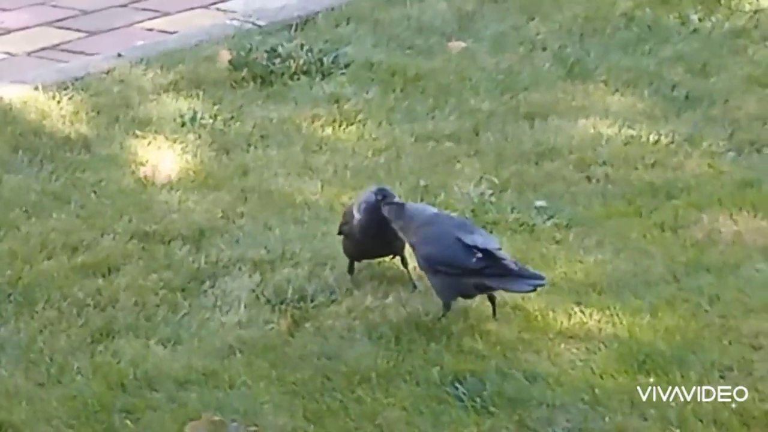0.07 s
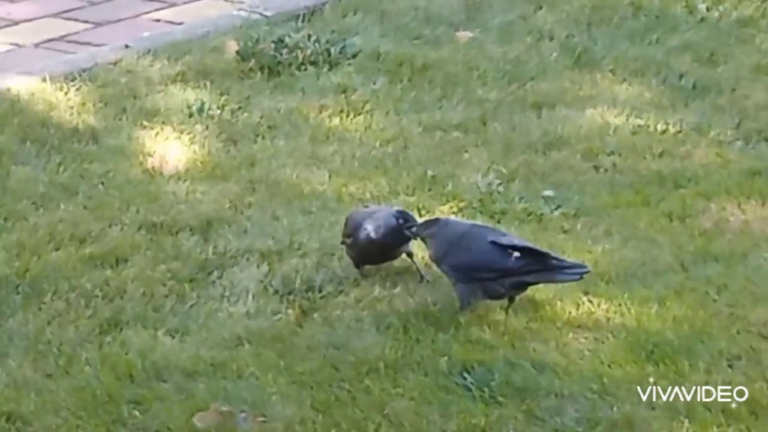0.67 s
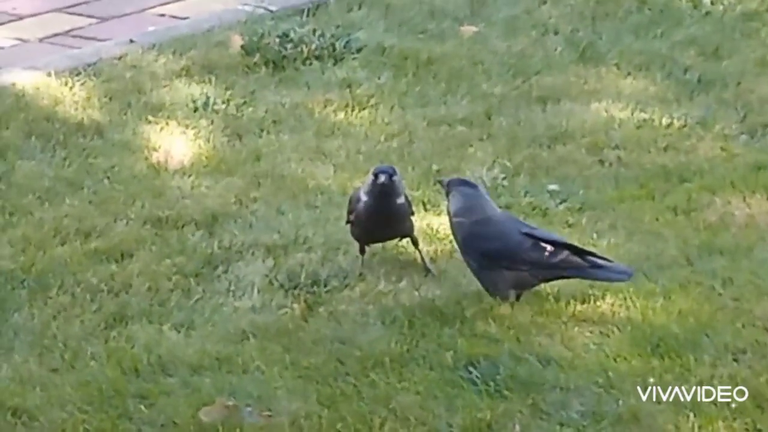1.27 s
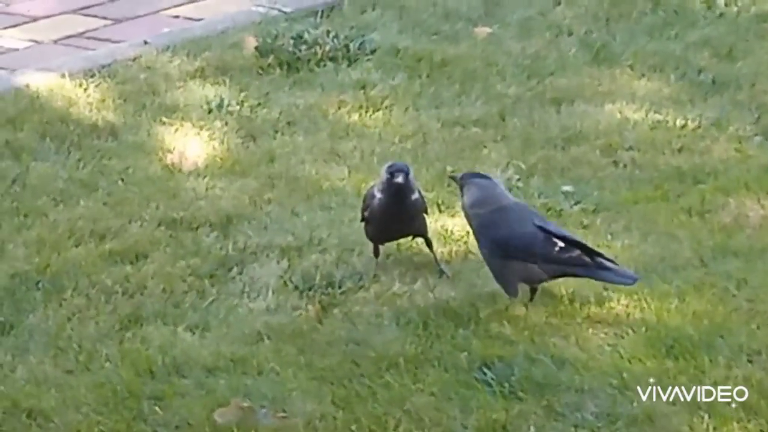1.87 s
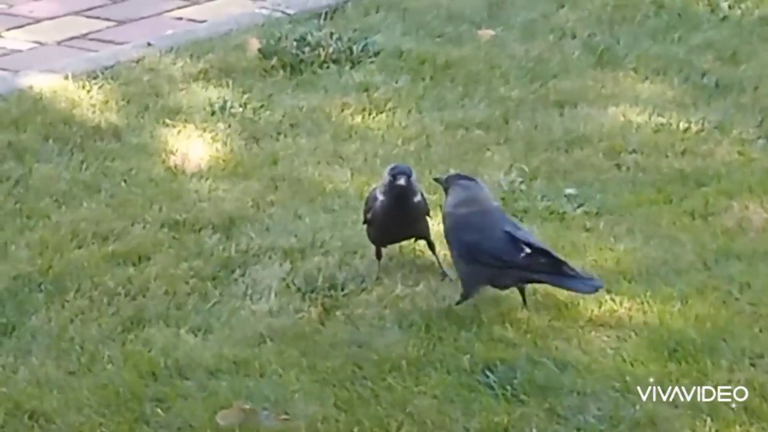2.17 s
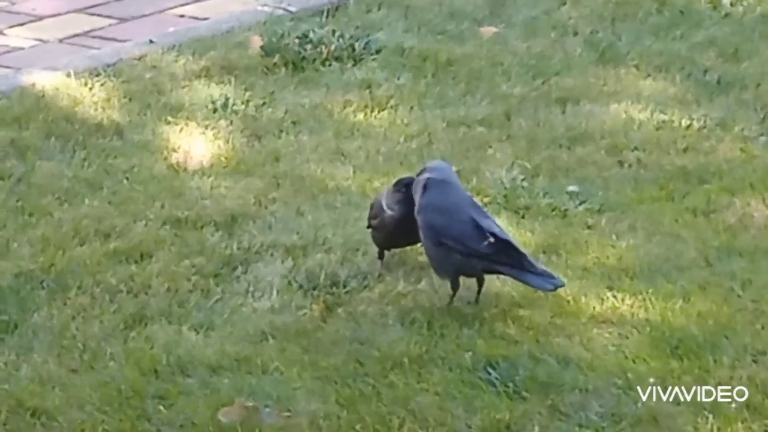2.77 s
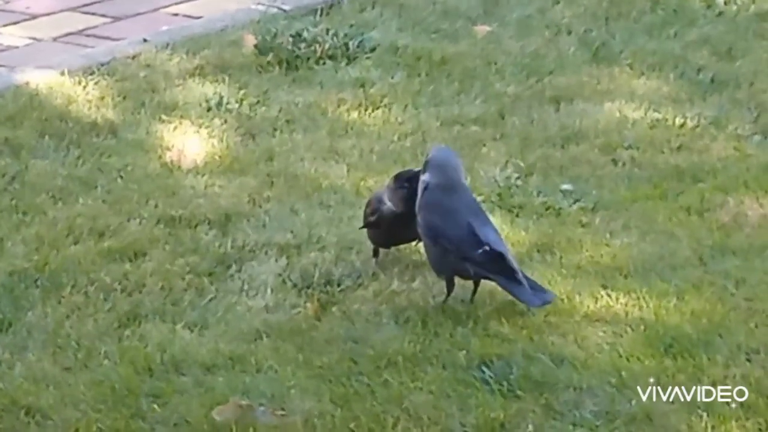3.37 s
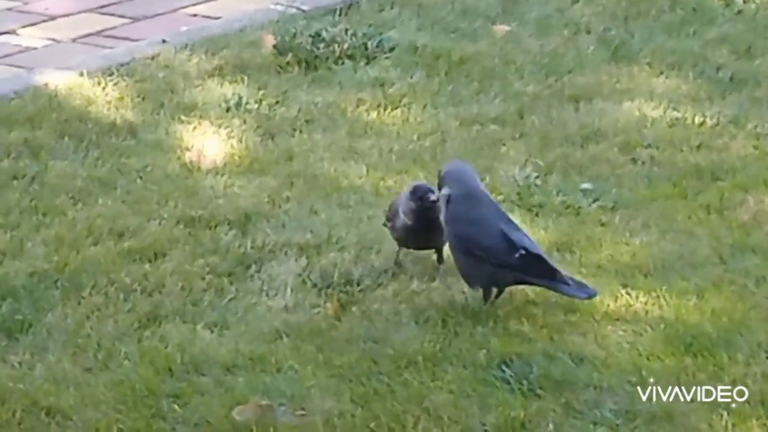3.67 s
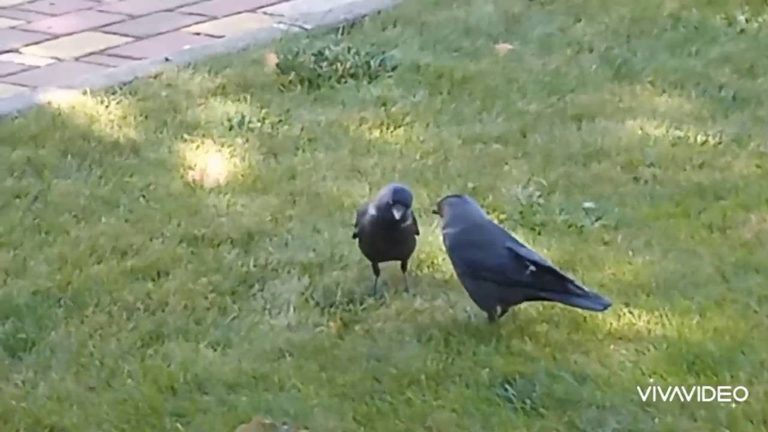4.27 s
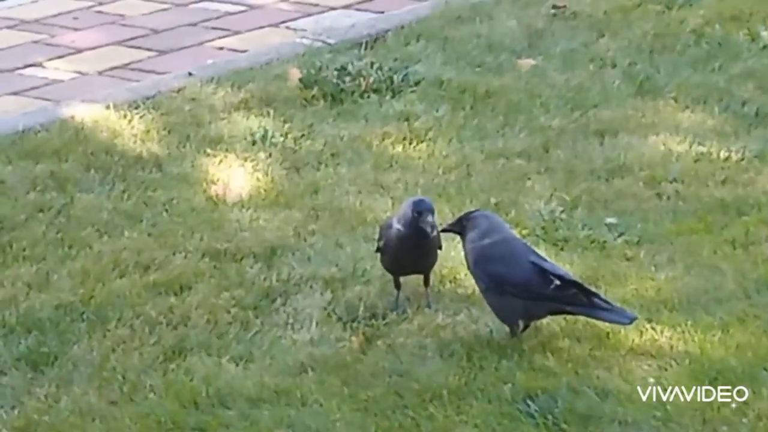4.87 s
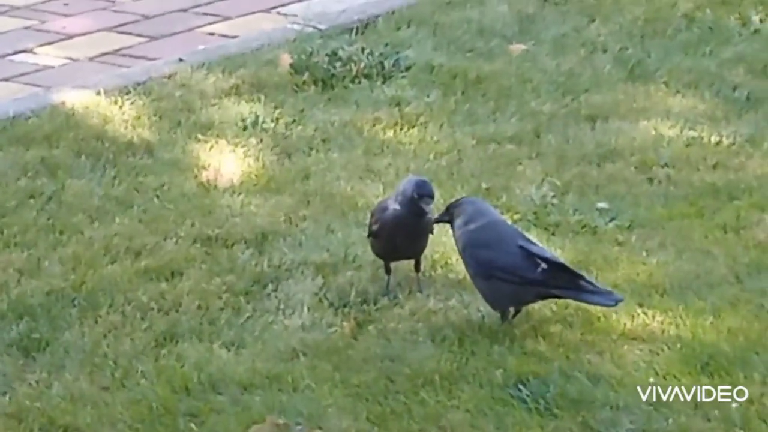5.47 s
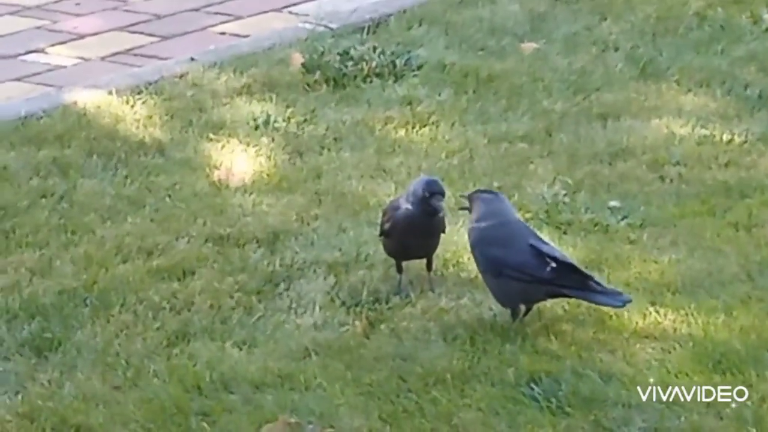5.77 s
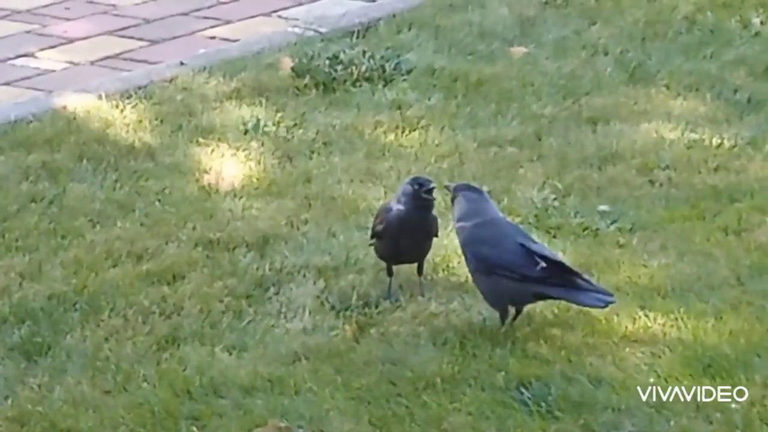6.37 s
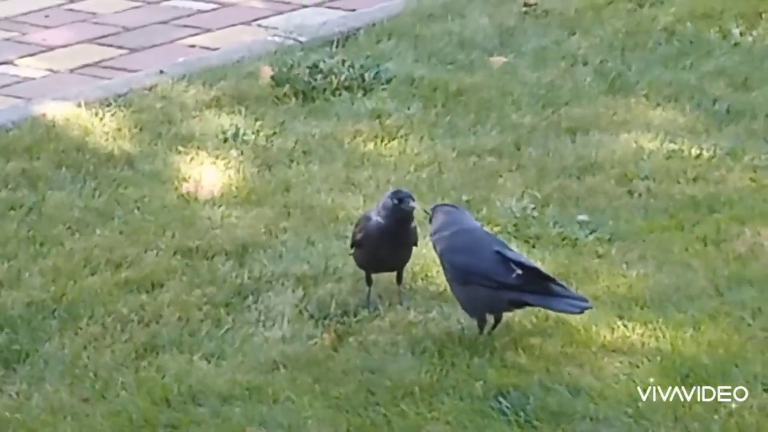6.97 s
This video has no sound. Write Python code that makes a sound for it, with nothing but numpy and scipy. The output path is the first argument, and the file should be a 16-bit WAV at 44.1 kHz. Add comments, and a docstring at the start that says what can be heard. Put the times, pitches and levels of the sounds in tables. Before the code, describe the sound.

Two jackdaws call on a garden lawn, a few metres from the microphone. At about 0.1 seconds comes a sharp falling tchak that breaks into a brief rattle, followed at 0.3 by a more drawn-out kya. Small bill clicks are scattered from 0.7 seconds to the end. A soft warble sounds near 0.9, a run of faint breathy rasps from 1.1 to 1.7, and a flurry of clicks and warbles near 2.3. Between 3 and 3.4 seconds come three quick calls: kya, tchak, kya. More soft warbles follow near 4 and 5.4 seconds. The loudest tchak lands at 6.3, followed by two faint rasps and the last clicks around 7. Throughout, a quiet low town rumble, a thin hiss, tiny ticks in the grass and far-off chirps of small birds lie underneath. Walls and trees give a faint echo.

```python
"""A garden lawn, one microphone, two jackdaws a few metres off. Low town rumble, a thin hiss and tiny
ticks in the grass lie under it all. It opens on a sharp falling 'tchak' and a drawn-out 'kya', the
syrinx sounding through throat and beak; bill clicks, soft warbles and breathy rasps follow, small birds
far behind. Near 3 s come two kyas with a tchak between, then more clicks and warbles, and at 6.3 s the
loudest tchak before the last rasps and clicks. Nearby walls and trees give a faint echo."""
import sys
import numpy as np
from scipy import signal
from scipy.fft import rfft, irfft
from scipy.io import wavfile

SR = 44100
rng = np.random.default_rng(int(sys.argv[2]) if len(sys.argv) > 2 else 0)


def transcribe(signal):
    """Save signal, clipped to [-1, 1], as a 16-bit WAV file at the path in sys.argv[1]."""
    frames = np.atleast_2d(signal).T
    limited = np.clip(frames, -1, 1)
    pcm = np.round(limited * 32767).astype(np.int16)
    wavfile.write(sys.argv[1], SR, pcm)


N = 318402
TOP_HZ = 15500  # upper edge of the microphone's band


def undb(db):
    """Decibels to gain."""
    return 10 ** (np.asarray(db) / 20)


def unit(x):
    """Scale to rms 1."""
    return x / np.sqrt(np.mean(x ** 2) + 1e-20)


def add(out, start, x):
    """Mix x into out from a start time in seconds."""
    i = max(int(start * SR), 0)
    out[i:i + len(x)] += x[:max(len(out) - i, 0)]


def db_at(hz, points):
    """Read a spectrum of (f/Hz, level/dB) points on a log-frequency axis."""
    f, db = np.transpose(points)
    return np.interp(np.log(np.maximum(hz, 1)), np.log(f), db)


def noise(n, response):
    """Noise of rms 1 with a gain that depends on frequency."""
    return unit(irfft(rfft(rng.standard_normal(n)) * response(np.fft.rfftfreq(n, 1 / SR)), n))


def wander(n, hz):
    """Random motion up to a given rate, spread about 1."""
    return noise(n + SR // 4, lambda f: 1 / (1 + (f / hz) ** 4))[:n]


def resonance(f, hz, width_hz):
    """A resonance peak, gain 1 at the centre."""
    return 1 / (1 + (2 * (f - hz) / width_hz) ** 2)


def fade(t, attack_s, release_s):
    """Soft start and end."""
    return np.clip(np.minimum((t - t[0]) / attack_s, (t[-1] - t) / release_s), 0, 1)


def soften(x, edge_hz=7000):
    """Steep low-pass that takes the fizz off small sounds."""
    return signal.sosfilt(signal.butter(8, edge_hz, fs=SR, output="sos"), x)


def background(bed_db=-63, hiss_db=-76):
    """A steady bed of low town rumble and faint, very high hiss; a flickering hiss; a wavering hum."""
    # spectrum of the steady background: low town rumble, plus a faint, very high hiss near 15 kHz:
    # f/Hz, relative level/dB
    spectrum = [(25, -24), (46, -7.5), (76, 2.5), (122, 0), (240, -6.5), (340, -14), (520, -18),
                (1150, -16.5), (2200, -21), (5400, -27.5), (8000, -39), (10000, -40), (13200, -54.5),
                (15000, -39)]
    # tones of the distant hum: f/Hz, level/dB
    hum_tones = [(90, -83), (251, -78), (380, -88.5)]
    bed = noise(N, lambda f: undb(db_at(f, spectrum))) * undb(bed_db + .5 * wander(N, hz=0.8))
    hiss = noise(N, lambda f: resonance(f, 5200, 3000) / (1 + (f / 7000) ** 16))
    hiss *= undb(hiss_db + 3 * wander(N, hz=56))
    hum = np.zeros(N)
    for hz, db in hum_tones:
        amplitude = np.sqrt(2) * undb(db + 2 * wander(N, hz=3.0))
        hum += amplitude * np.sin(2 * np.pi * np.cumsum(hz + 4 * wander(N, hz=10.4)) / SR)
    return bed + hiss + hum


def rumble_swells():
    """The town's low rumble rises and sinks again for a moment."""
    # swells: t/s, length/s, crest level/dB, centre f/Hz
    swells = [(0, 0.39, -66.5, 144), (3.001, 0.25, -68.5, 253), (3.273, 0.23, -59.5, 230),
              (6.501, 0.99, -64.5, 119.3)]
    out = np.zeros(N)
    for start, length, db, hz in swells:
        n = int(length * SR)
        add(out, start, noise(n, lambda f: resonance(f, hz, hz) ** 2) * np.hanning(n) * undb(db))
    return out


def grass(count=150, tick_db=-60, spread_db=4, crackle_s=0.0053):
    """On the lawn, blades crackle in tiny bursts under feet and bills, each with its own colour."""
    out = np.zeros(N)
    t = np.arange(SR // 40) / SR
    for when, size, colour in rng.random((count, 3)):
        burst = noise(len(t), lambda f: resonance(f, 4000 + 3000 * colour, 3900) / (1 + (f / 1e4) ** 8))
        burst *= np.minimum(t / 0.0012, 1) * np.exp(-t / crackle_s)
        gain = undb(tick_db + spread_db * (2 * size - 0.5))
        add(out, when * N / SR, (soften(burst) + 0.08 * burst) * gain)
    return out


def syrinx(controls, throat_shape, beak_width_hz, jitter, breath_db, release_s, doubling=0):
    """A jackdaw's voice: pulses and rushing air from the syrinx, coloured by throat and beak."""
    t, hz, db, beak_hz, bright_db, odd_db, rough = controls
    n = len(t)
    phase = 2 * np.pi * np.cumsum(hz * (1 + jitter * rough * wander(n, hz=665))) / SR
    k = np.arange(1, 25)[:, None]
    f = k * hz
    upper = np.clip((f - 2500) / 1500, 0, 1)
    # the upper harmonics each come and go as the membranes and throat shift
    waver_db = 3 * np.array([wander(n, hz=35) for _ in k])
    throat = undb(db_at(f, throat_shape) + upper * (bright_db + waver_db))
    beak = resonance(f, beak_hz, beak_width_hz) * resonance(f, beak_hz, 2270)
    # odd harmonics fade when the two halves of a cycle become alike
    size = (beak + throat) * undb(odd_db * (k % 2)) * (f < TOP_HZ)
    lag = 2 * np.arctan(2 * (f - beak_hz) / beak_width_hz)  # the beak rings on after each pulse
    voice = np.sum(size * np.cos(k * phase - lag), axis=0) / np.sqrt(np.sum(size ** 2, axis=0) / 2)
    # at high pitch, strong and weak cycles alternate and put lines between the harmonics
    uneven = doubling * np.clip(hz / 600 - 1, 0, 1) * np.cos(phase / 2 + wander(n, hz=150))
    shimmer = 0.23 * rough * wander(n, hz=398)
    voice *= 1 + uneven + shimmer
    air = noise(n, lambda f: undb(db_at(f, throat_shape))
                + 0.047 * resonance(f, beak_hz.mean(), 1300) ** 2)
    breath = undb(breath_db) * (rough + 0.038) * air * (1 + np.cos(phase))
    return (voice + breath) * undb(db) * fade(t, 0.00033, release_s)


def tchak_controls(squeal_s, rattle_s, start_hz, squeal_db, rattle_db, squeal_rough, rest_hz):
    """The pitch falls ever faster to a chaotic register break, then ever slower as the rattle dies."""
    break_hz, last_hz = 950, 296.3
    fade_db_per_s, dull_db_per_s, beak_hz_per_s = 160, 70, 800
    t = np.arange(0, squeal_s + rattle_s, 1 / SR)
    squeal = np.minimum(t / squeal_s, 1)
    since_break = np.maximum(t - squeal_s, 0)
    opening = np.maximum(1 - t / 0.004, 0)
    broken = np.minimum(since_break / 0.0051, 1)

    def across_break(before, after):
        return (1 - broken) * before + broken * after

    hz = start_hz - (start_hz - break_hz) * squeal ** 1.5
    hz *= (last_hz / break_hz) ** ((since_break / rattle_s) ** 0.46)
    push_db = np.interp(squeal, [0, 0.65, 1], [-7.5, 0, -4.5]) - 14 * opening
    flutter_db = 2 * wander(len(t), hz=55)
    db = across_break(squeal_db + push_db, rattle_db - fade_db_per_s * since_break + flutter_db)
    bright_db = across_break(7 + push_db, -dull_db_per_s * since_break)  # a harder push is brighter
    rough = across_break(squeal_rough + 0.44 * opening, 0.22 + 0.85 * np.exp(-since_break / 0.014))
    # the beak tracks the second harmonic down to its rest, then creeps up during the rattle
    beak_hz = np.maximum(2 * hz, rest_hz + beak_hz_per_s * since_break)
    odd_db = 7 * (1 - squeal) ** 2
    return t, hz, db, beak_hz, bright_db, odd_db, rough


def tchaks():
    """Sharp calls a few metres off: a falling squeal that breaks into a low rattle."""
    # calls: t/s, squeal/s, rattle/s, start f/Hz, squeal level/dB, rattle level/dB, squeal roughness/0-1,
    # resting beak f/Hz, then the beak opening's tint/dB at 1.3, 4.3, 6.5 and 9 kHz
    calls = [(0.081, 0.027, 0.12, 1330, -32, -34.5, 0.16, 2140, 15.5, 6, 7, 1.5),
             (3.062, 0.031, 0.11, 1493, -29.5, -36.5, 0.2, 2300, 12.5, -5.5, 12.5, -9.5),
             (6.278, 0.025, 0.09, 1468, -24, -30, 0.19, 2210, -9, -1, 4.5, -11)]
    # the throat's broad response under the beak resonance: f/Hz, gain/dB
    throat = [(500, -45.5), (1100, -34), (1700, -26.5), (3400, -13), (4000, -26), (4700, -17.5),
              (5300, -26.5), (5900, -21.5), (6600, -28.5), (7800, -47), (9200, -31.5), (11000, -50.5),
              (14000, -63)]
    out = np.zeros(N)
    for start, *shape, low, middle, high, top in calls:
        tint = [(1300, low), (2400, 0), (4300, middle), (6500, high), (9000, top)]
        tinted_throat = [(hz, db + db_at(hz, tint)) for hz, db in throat]
        add(out, start, syrinx(tchak_controls(*shape), tinted_throat, beak_width_hz=690, jitter=0.0834,
                               breath_db=-9, release_s=0.037, doubling=0.073))
    return out


def kya_controls(length, attack_s, sag_at_s, top_hz, plateau_hz, last_hz, level_db, fade_db,
                 bright_db, odd_db, beak_hz):
    """The tone scoops up, sags to a plateau and collapses, fading and dulling while the beak closes."""
    swell_db, dull_db_per_s, close_hz_per_s = 20.5, 57, 1350
    t = np.arange(0, length, 1 / SR)
    onset = np.maximum(1 - t / attack_s, 0)
    since_attack = np.maximum(t - attack_s, 0)
    sag = np.exp(-np.maximum(t - sag_at_s, 0) / 0.031)
    collapse = np.exp((t - length) / 0.028)
    scoop = 1 - 0.091 * onset ** 2
    hz = (plateau_hz + (top_hz - plateau_hz) * sag) * scoop - (plateau_hz - last_hz) * collapse
    held_back = np.minimum(onset / 0.74, 1)  # a soft lead-in comes before the swell
    db = level_db - swell_db * held_back - fade_db * (1 - np.exp(-since_attack / 0.053)) - 5 * collapse
    loose = onset + collapse ** 2  # at both ends the syrinx is loose: rough and hollow
    rough = 0.08 + 0.5 * loose
    treble_db = bright_db - dull_db_per_s * since_attack - 5 * onset
    return t, hz, db, beak_hz - close_hz_per_s * since_attack, treble_db, odd_db + 10 * loose, rough


def kyas():
    """Drawn-out calls a few metres off: the syrinx holds a clear tone with rough edges."""
    # calls: t/s, length/s, attack/s, sag delay/s, top f/Hz, plateau f/Hz, last f/Hz, level/dB, fade/dB,
    # brightness/dB, odd harmonics/dB, beak f/Hz
    calls = [(0.292, 0.181, 0.01254, 0.021, 721.3, 585.4, 345, -30, 10, 0.5, -3, 3060),
             (2.96, 0.18, 0.0254, 0.026, 728, 596, 582, -33, 15.5, -3.5, -4.5, 2860),
             (3.291, 0.144, 0.0198, 0.063, 723, 618, 340, -32.5, 7.5, 4, -8.5, 2820)]
    # the throat's broad response under the beak resonance: f/Hz, gain/dB
    throat = [(650, -33.5), (1300, -23.5), (1900, -51), (3500, -16), (4200, -14), (4650, -21),
              (5200, -13.5), (5800, -21), (6400, -23.5), (7000, -28), (7700, -31.5), (9000, -37.5),
              (11000, -50.5), (14000, -71)]
    out = np.zeros(N)
    for start, *shape in calls:
        add(out, start, syrinx(kya_controls(*shape), throat, beak_width_hz=980, jitter=0.082,
                               breath_db=-6, release_s=0.019))
    return out


def whistle(t, hz, db, rough, jitter=0.24, edge_s=0.0013):
    """One side of a syrinx: a thin whistle that frays into a hoarse chirp as it roughens."""
    phase = 2 * np.pi * np.cumsum(hz * (1 + jitter * rough * wander(len(t), hz=812))) / SR
    tone = np.sin(phase) + undb(-36) * np.sin(2 * phase)
    flutter = 1 + 1.26 * rough * wander(len(t), hz=450)
    return tone * flutter * undb(db) * fade(t, edge_s, edge_s)


def glide(length, start_hz, end_hz, db, rough, edge_s=0.0013):
    """A whistle sliding straight from one pitch to another."""
    t = np.arange(0, length, 1 / SR)
    return whistle(t, np.linspace(start_hz, end_hz, len(t)), db, rough, edge_s=edge_s)


def distant_birds(count=22, low_hz=1150, high_hz=3800):
    """Far from the microphone: a few clear notes, and fainter chirps at random."""
    # clear notes: t/s, length/s, start f/Hz, end f/Hz, level/dB
    notes = [(0.632, 0.016, 2700, 2580, -57), (1.164, 0.032, 1705, 1710, -65),
             (1.272, 0.016, 1450, 1410, -59.5), (1.665, 0.014, 1540, 1440, -60),
             (3.72, 0.038, 3300, 3500, -65.5), (4.766, 0.063, 3200, 3360, -70),
             (4.856, 0.057, 3950, 3630, -65.5), (5.147, 0.031, 2086, 1890, -64.5),
             (6.049, 0.027, 5050, 5170, -63), (6.185, 0.037, 2420, 2410, -61.5),
             (6.903, 0.036, 2990, 2750, -61.5)]
    out = np.zeros(N)
    for start, *note in notes:
        add(out, start, glide(*note, rough=0.17, edge_s=0.0084))
    for when, pitch, size in rng.random((count, 3)):
        hz = low_hz * (high_hz / low_hz) ** pitch
        chirp = glide(0.039 * (.5 + size), hz, 0.958 * hz, db=-70, rough=.25, edge_s=0.014)
        add(out, when * N / SR, chirp)
    return out


def bill_clicks(scatter_db=-22, scatter_s=0.014, snap_s=0.005, snap_lift_db=5):
    """A bill snaps and rings briefly; the ground scatters a short tail."""
    # clicks: t/s, ring peak/dB, centre f/Hz, bright snap before its lift/dB
    clicks = [(0.7335, -40, 4330, -78), (0.8239, -31, 4300, -72), (0.9802, -43.5, 4700, -79),
              (1.023, -36.5, 5000, -69.5), (1.4287, -38, 4330, -86), (1.4563, -44, 5400, -77),
              (1.9427, -44.5, 5660, -82), (2.0393, -50, 4770, -73), (2.173, -48.5, 5570, -69),
              (2.2723, -34.5, 5380, -64), (2.28, -36.5, 4330, -59.5), (2.7197, -33, 4370, -78),
              (2.9472, -41.5, 6200, -79), (3.1504, -39, 5470, -64.5), (3.499, -42.5, 4460, -72),
              (3.595, -38, 4120, -91), (3.8455, -54, 5550, -66), (3.8888, -47.5, 4120, -63.5),
              (4.0663, -35.5, 4680, -72), (4.451, -44, 5460, -73), (4.994, -39.5, 4260, -78),
              (5.1785, -38, 5940, -69.5), (5.352, -34, 3570, -75), (5.754, -44, 5150, -77),
              (5.7822, -43.5, 5400, -77), (5.838, -40, 4400, -76), (6.5523, -44, 6240, -77),
              (6.682, -43.5, 6490, -68.5), (6.8601, -44, 4260, -75), (7.0282, -47, 6600, -74),
              (7.0428, -37.5, 4800, -77), (7.1281, -41, 5330, -76)]
    # modes of the bill: f/Hz, t60/s, level/dB
    modes = [(2390, 0.019, -12.5), (3450, 0.012, -6.5), (4296, 0.013, -8), (4990, 0.014, -7),
             (5584, 0.026, -12.5), (6100, 0.0046, -7.5)]
    out = np.zeros(N)
    t = np.arange(SR // 20) / SR
    for start, db, hz, snap_db in clicks:
        ring = np.zeros(len(t))
        for mode_hz, t60, mode_db in modes:
            detuned_hz = mode_hz * (1 + 0.057 * rng.standard_normal())
            tone = np.sin(2 * np.pi * detuned_hz * t + rng.uniform(0, 2 * np.pi))
            ring += undb(mode_db - 60 * t / t60) * resonance(mode_hz, hz, 2200) * tone
        ring = soften(ring * np.minimum(t / 0.00018, 1))
        tail = soften(noise(len(t), lambda f: resonance(f, hz, 2500))) * np.exp(-t / scatter_s)
        snap = noise(len(t), lambda f: resonance(f, 8300, 2300)) * np.exp(-t / snap_s)
        body = ring / np.abs(ring).max() + undb(scatter_db) * tail
        add(out, start, undb(db) * body + undb(snap_db + snap_lift_db) * snap)
    return out


def warbles(crest=0.59, swell_db=11, sink_db=15.5):
    """Soft arched notes; the hoarser one is, the more it breaks up and the syrinx's other side joins."""
    # notes, alone or strung together: t/s, length/s, time to the top/s, start f/Hz, top f/Hz, end f/Hz,
    # level/dB, roughness/0-1, pitch ratio of the other side
    notes = [(0.874, 0.046, 0.017, 3670, 4480, 2800, -41, 0.33, 0.82),
             (0.901, 0.036, 0.011, 2420, 2700, 2360, -53, 0.54, 1.5),
             (2.254, 0.03, 0.0081, 3200, 4600, 3410, -43.5, 0.33, 0.99),
             (2.274, 0.027, 0.0078, 3430, 3950, 2560, -40.5, 0.15, 1.77),
             (2.297, 0.027, 0.015, 2620, 3430, 2540, -38.5, 0.18, 1.26),
             (2.314, 0.031, 0.0033, 2540, 2790, 2190, -50, 0.36, 2),
             (3.895, 0.033, 0.017, 3690, 3980, 3800, -55.5, 0.16, 1.6),
             (3.934, 0.091, 0.019, 4550, 4980, 4200, -61.5, 0.23, 0.97),
             (3.984, 0.05, 0.018, 4350, 5300, 2170, -56.5, 0.26, 0.68),
             (4.03, 0.047, 0.016, 3350, 4080, 2626, -44.5, 0.39, 0.83),
             (4.066, 0.021, 0.0096, 2080, 2660, 2250, -43.5, 0.22, 1.35),
             (5.435, 0.072, 0.017, 4870, 4920, 3950, -48.5, 0.17, 1),
             (5.492, 0.0273, 0.0024, 3550, 3520, 2600, -56, 0.25, 1.7),
             (6.2, 0.15, 0.025, 4900, 5020, 4550, -60.5, 0.07, 0.76)]
    out = np.zeros(N)
    for start, length, top_s, start_hz, top_hz, end_hz, level_db, rough, ratio in notes:
        t = np.arange(0, length, 1 / SR)
        rise = np.maximum(1 - t / top_s, 0)
        fall = np.clip((t - top_s) / (length - top_s), 0, 1)
        hz = top_hz - (top_hz - start_hz) * rise ** 2 - (top_hz - end_hz) * fall ** 1.4
        before_crest = np.maximum(1 - t / length / crest, 0)
        after_crest = np.maximum((t / length - crest) / (1 - crest), 0)
        db = level_db - swell_db * before_crest ** 2 - sink_db * after_crest ** 2
        main_db, side_db = (db + 7 * rough * wander(len(t), hz=170) for _ in range(2))
        main = whistle(t, hz, main_db, rough, jitter=0.23)
        other_side = whistle(t, hz * ratio, side_db, rough, jitter=0.26)
        add(out, start, main + rough * undb(3) * other_side)
    return out


def rasps(stretch=1.6):
    """Both sides of the syrinx squeak hoarsely downwards in a puff of breath."""
    # puffs: t/s, length before the stretch/s, level/dB, centre f/Hz
    puffs = [(1.122, 0.024, -53.5, 3890), (1.244, 0.018, -50.5, 4160), (1.376, 0.027, -48, 4440),
             (1.416, 0.024, -50.5, 3360), (1.484, 0.038, -50.5, 4350), (1.557, 0.024, -51, 4430),
             (1.592, 0.025, -50.5, 4280), (1.631, 0.046, -54, 4360), (2.322, 0.021, -52, 4520),
             (6.573, 0.037, -53, 4130), (6.654, 0.036, -50.5, 4460)]
    out = np.zeros(N)
    for start, length, db, hz in puffs:
        high = glide(stretch * length, 1.48 * hz, 0.76 * hz, db=-2, rough=0.45)
        low = glide(stretch * length, 0.9 * hz, 0.55 * hz, db=-7, rough=0.615)
        breath = noise(len(high), lambda f: resonance(f, hz, 3400) / (1 + (1800 / (f + 1)) ** 4))
        swell = np.interp(np.linspace(0, 1, len(high)), [0, .25, .55, 1], [0.046, 1, 0.59, 0.1])
        add(out, start, soften(high + low + undb(-8) * breath, edge_hz=6540) * swell * undb(db))
    return out


def garden_echo(x, early_db=-20, early_s=0.056, tail_db=-24, t60=1.02):
    """A few reflections, close scatter from shrubs, and a long faint echo from houses and trees."""
    # colour of the echo: f/Hz, relative level/dB
    colour = [(500, 13.5), (1500, 11), (2500, 7), (4000, 10.5), (6000, 11.5), (9000, 9.5), (14000, -62)]
    # first reflections at the microphone: delay/s, level/dB
    reflections = [(.0047, -15), (.0135, -25.5), (.024, -24.5), (0.043, -26.5)]
    t = np.arange(int(1.5 * SR)) / SR
    early, late = (noise(len(t), lambda f: undb(db_at(f, colour))) for _ in range(2))
    early = unit(early * np.exp(-t / early_s) * np.minimum(t / 0.0088, 1))
    late = unit(late * undb(-60 * t / t60) * np.minimum(t / 0.11, 1))
    response = (undb(early_db) * early + undb(tail_db) * late) / np.sqrt(len(t))
    for delay, db in reflections:
        add(response, delay, undb([db]))
    return signal.fftconvolve(x, response)[:N]


def scene():
    """At the microphone, in mono: the lawn and the birds, their echo and the background."""
    direct = grass() + distant_birds() + tchaks() + kyas() + warbles() + rasps() + bill_clicks()
    return (direct + garden_echo(direct) + background() + rumble_swells())[None]


def record(dry):
    """The microphone's chain cuts the top off steeply."""
    return signal.sosfilt(signal.ellip(10, .2, 70, TOP_HZ, fs=SR, output="sos"), dry)


dry = scene()
out = record(dry)
transcribe(out)
```